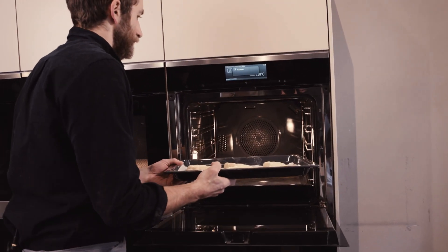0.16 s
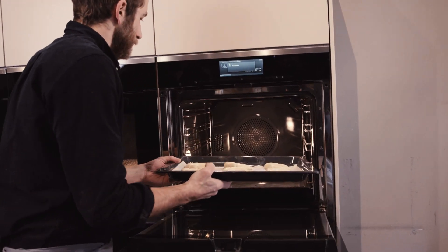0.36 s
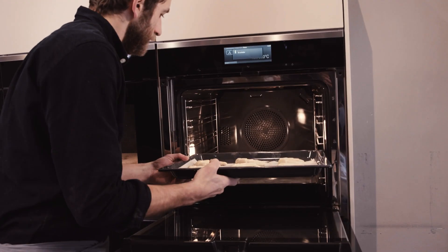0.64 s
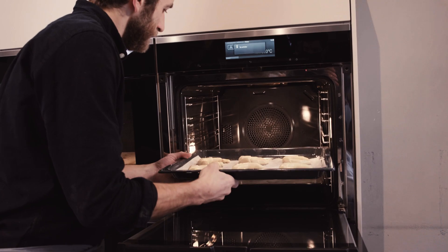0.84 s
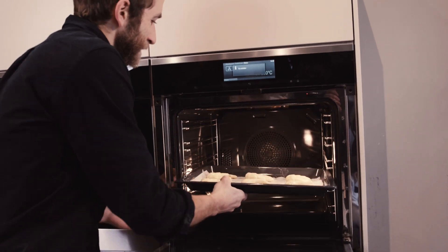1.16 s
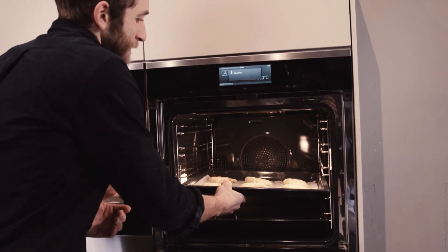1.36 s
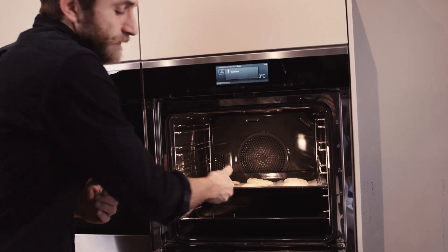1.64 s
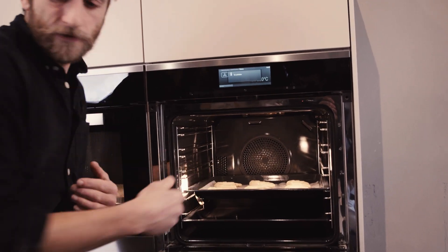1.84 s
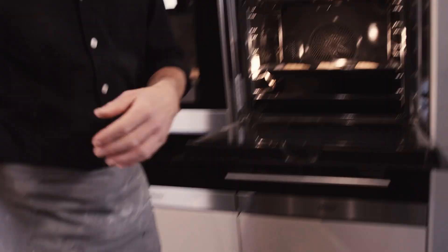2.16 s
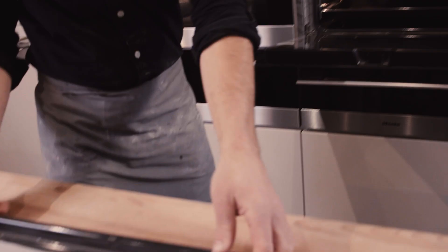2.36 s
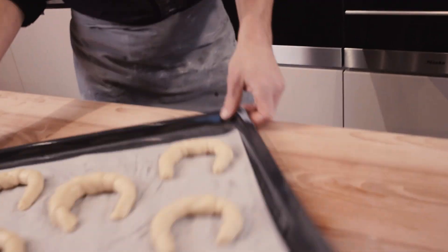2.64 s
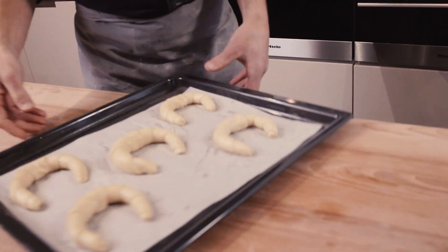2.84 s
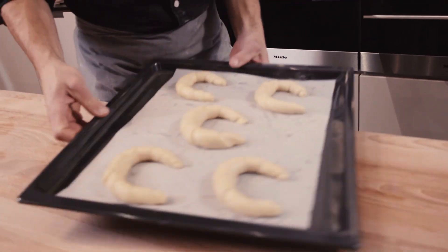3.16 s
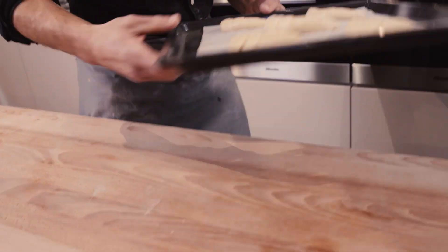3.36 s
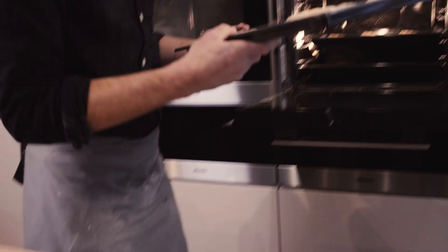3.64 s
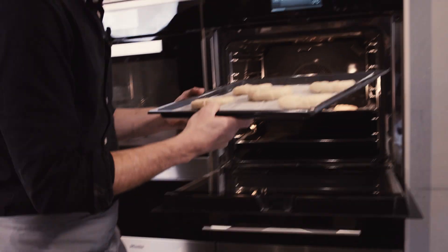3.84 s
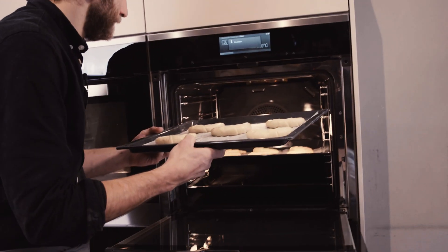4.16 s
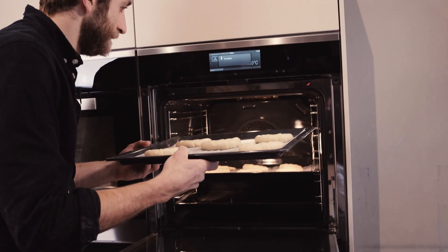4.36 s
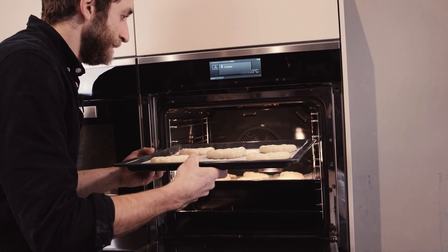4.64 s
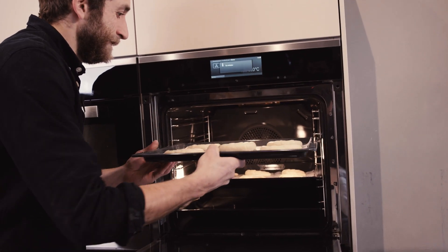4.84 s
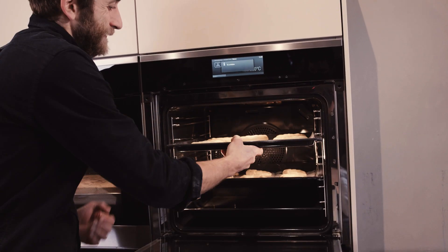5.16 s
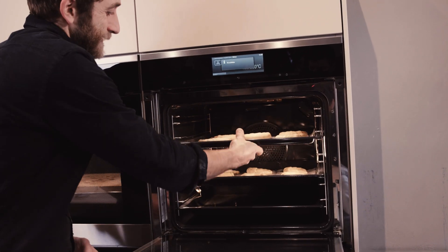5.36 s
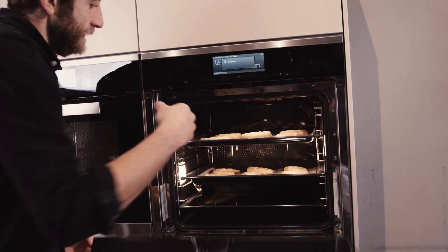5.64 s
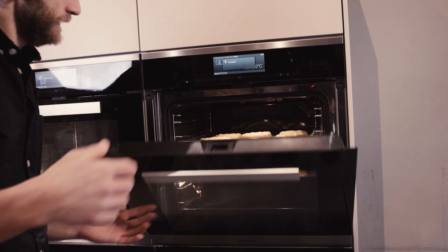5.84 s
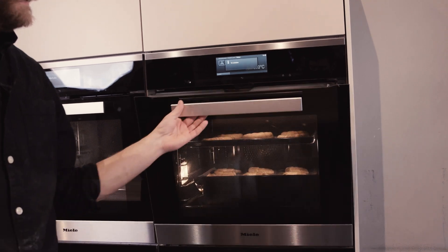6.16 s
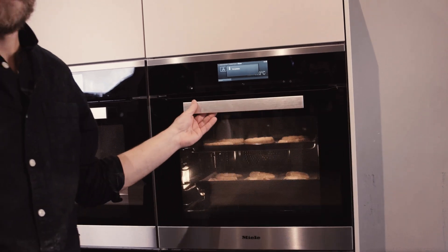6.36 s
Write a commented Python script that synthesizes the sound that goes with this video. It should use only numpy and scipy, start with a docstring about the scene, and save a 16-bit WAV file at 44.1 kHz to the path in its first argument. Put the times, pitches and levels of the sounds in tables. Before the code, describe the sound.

A metal baking tray clatters and scrapes onto oven rails, a second rasps off a wooden worktop and slides in, then the oven door bangs shut.

```python
"""Two steel baking trays are knocked onto an oven's wire rails and pushed home, in a hard-walled kitchen.
Blows ring each sheet's modes; random stick-slip makes the scrapes. In between, the second tray rasps and
judders off a wooden worktop. At the end the oven door swings up on creaking hinges and bangs shut.
Behind are footfalls, shuffling, sleeves, the oven's fan and hum. One microphone, a step or two away."""
import sys
import numpy as np
from scipy import signal
from scipy.fft import rfft, irfft
from scipy.io import wavfile

SR = 44100
rng = np.random.default_rng(int(sys.argv[2]) if len(sys.argv) > 2 else 0)


def store_wav(level_fs):
    """Save 16-bit WAV to argv[1]."""
    pcm = np.round(np.clip(np.atleast_2d(level_fs), -1, 1) * 32767)
    wavfile.write(sys.argv[1], SR, pcm.T.astype(np.int16))


N = 287091
TIME = np.arange(N) / SR

# Levels in the tables are relative: each source may have a gain of its own on top.
# A tray lands on the rails, one rim and then the other:
# (time [s], level [dB], bass [dB], treble [dB], second rim's lag [s], second rim's relative level [dB])
KNOCKS = [(0.517, -32.5, 9, -7, 0.0096, 5), (0.807, -26, -8, 10.5, 0.0091, 7.5),
          (0.866, -27, 5.5, -4, 0.029, 0), (1.051, -28.5, -6, 1.5, 0.0082, -1),
          (1.203, -21, -11, 8.5, 0.0073, 0.5), (1.322, -17, 1, 3.5, 0.0061, -15),
          (1.387, -23.5, -8, -1, 0.0073, -7), (1.510, -21, -2.5, 3, .006, -2),
          (1.5955, -17, -6, 8, .012, -1), (1.634, -22, -1, 4, .012, 2.5), (4.476, -30.5, 4, -2.5, .016, 5),
          (4.605, -30.5, 7.5, -0.5, .036, -8.5), (5.157, -20.5, -4, 6, .019, -1),
          (5.325, -22.5, 4, 7, .016, 2.5), (5.542, -22.5, 6.5, -3, 0.0092, -3.5)]
# The second rim sounds bassier and duller than the first and chatters longer; either may be louder
FIRST_CHATTER_S, SECOND_CHATTER_S = 0.0029, 0.0099  # time constants
SECOND_BASS_DB, SECOND_TREBLE_DB = 4.5, -2.5  # relative to the first rim
# Pushes along the rails:
# (start [s], fastest [s], end [s], level [dB], bright grit at the start relative to the scrape [dB])
PUSHES = [(0.80, 0.83, 1.0, -30.5, -7), (1.121, 1.21, 1.374, -27, -1), (1.38, 1.45, 1.54, -32.5, -25),
          (1.53, 1.565, 1.66, -25, -11), (4.84, 4.90, 4.9, -47, -9.5), (4.912, 5.14, 5.42, -24, -6.5),
          (5.28, 5.36, 5.565, -29.5, -3)]
SCRAPE_POWER = 0.25  # the scrape's amplitude is this power of the sliding speed
# The rim snags, and the scrape flares up as it breaks free:
# (time [s], added amplitude relative to the steady scrape [dB])
SNAGS = [(4.933, 5.5), (4.966, 0), (5.020, 0), (5.246, -2)]
SNAG_S = 0.018  # time constant of a flare
# Ringing partials of each tray on its rails: (frequency [Hz], level [dB])
LOWER_TRAY_PARTIALS = [(608.3, -41), (952.8, -59), (1206, -44.5), (1690, -64.5), (1954, -36.5),
                       (2266, -36.5), (2649, -31.5), (3036, -60.5), (3208, -39.5), (3418, -56.5),
                       (3575, -38.5), (4522, -36.5), (4980, -62.5), (5292, -45.5), (6115, -46),
                       (6385, -59.5)]
UPPER_TRAY_PARTIALS = [(699.8, -54), (1384, -76), (1916, -34), (2099, -63), (2622, -49), (2891, -58),
                       (3095, -34.5), (3300, -38), (3386, -41), (3752, -59), (3935, -54), (4048, -32),
                       (4296, -52), (4544, -63), (4834, -41), (5938, -64)]
# The crowd of short modes in each steel sheet: (frequency [Hz], level per Hz [dB])
LOWER_SHEET = [(40, -38.5), (85, -28.5), (130, 6), (300, 0.5), (450, 0.5), (650, 0.5), (900, -3),
               (1350, 0.5), (1650, -3.5), (2100, -2), (3000, -2.5), (5000, -8.5), (8000, -17.5),
               (15500, -31)]
UPPER_SHEET = [(40, -37), (85, -22), (140, 1.5), (300, 1), (480, -1.5), (700, 0), (1050, -3), (1350, 1.5),
               (1650, -3.5), (2000, 0), (3000, -4.5), (4500, -7.5), (7000, -17.5), (15500, -33.5)]
# Fine enamel roughness heard under the sliding tray: (frequency [Hz], level per Hz [dB])
GRIT_COLOUR = [(2000, -5), (7000, 1), (11000, -6.5), (14000, -5), (16000, -7)]
# The rack's dull thump under a knock: (frequency [Hz], level [dB], t60 [s])
RACK_MODES = [(134.2, 1.5, 0.31), (187.4, -2, 0.32), (257.5, -7, 0.23), (343, -4, 0.23)]
RACK_DB = -15.5
# The oven's liner and rails: (frequency [Hz], level [dB], t60 [s])
OVEN_MODES = [(121.4, 3.5, 0.83), (373, 0.5, 2.9), (740, -22, 1.4), (983, -6.5, 1.2), (1150, -7, 0.6),
              (2340, -18.5, 2.5), (3440, -18, 1.2), (12880, -12, .9)]

# One pull over the worktop: (start [s], fastest [s], end [s])
DRAG_STROKE = (2.53, 2.8, 3.249)
# Rasp of tray on wood: (frequency [Hz], level per Hz [dB])
DRAG_COLOUR = [(45, -36), (100, -8.5), (160, 1), (260, -2.5), (400, -3.5), (600, 1.5), (850, -8),
               (1400, -5.5), (2100, 0), (3000, -5.5), (5000, -11.5), (9000, -20), (15500, -30.5)]
# Ringing of the dragged tray: (frequency [Hz], level [dB], t60 [s])
DRAG_MODES = [(253, -6, 0.98), (1750, -4, 0.31), (2062, -1, 0.093), (2520, -6, 0.12), (3020, -6.5, 0.074),
              (3400, -16, 0.15)]
RASP_DB, RASP_POWER = -26.5, 1.02  # level at full speed; amplitude is this power of speed
JUDDER_DB, JUDDER_POWER = -34.5, 0.3  # the same for the judder
JUDDER_HZ, JUDDER_SAG_HZ = 575, 25.93  # mean pitch at rest and its drop at full speed
# The judder's last groan as the tray lifts off: (start [s], peak [s], end [s])
LIFT_STROKE = (3.185, 3.205, 3.222)
LIFT_DB = -33.5
# The rim bumping on the wood: (time [s], level [dB], bass [dB], treble [dB], chatter time constant [s])
BUMPS = [(2.652, -32, 12, -6, 0.0052), (2.885, -26.5, -20, 3, 0.03), (3.155, -32.5, -10, -9, 0.0016),
         (3.203, -38, 18, -11, 0.0039)]

# The door meeting its seal and catch:
# (time [s], level [dB], bass [dB], treble [dB], chatter time constant [s])
SLAM = [(6.414, -30.5, 9, -10, 0.032), (6.429, -20, 2, 4, 0.01), (6.444, -16, 5, -5, 0.0055),
        (6.480, -21, 1, -2, 0.024), (6.503, -30, 19, -2, 0.0037)]
# Short modes of the door: (frequency [Hz], level per Hz [dB])
DOOR_COLOUR = [(30, -45), (70, -20), (130, -2), (190, -6), (350, -5.5), (480, -5), (680, -6), (800, -8.5),
               (1020, -5), (1500, -16), (2400, -13.5), (2900, -8.5), (5000, -23), (15000, -45.5)]
# Ringing of the door: (frequency [Hz], level [dB], t60 [s])
DOOR_MODES = [(329, 5, 0.13), (451, -5, 0.097), (691.5, -6, 0.062), (1085, -4, 0.074), (2850, -2, 0.062)]
# Hinge creaks: (time [s], length [s], mean pitch [Hz], level [dB], rub relative to the tone [dB])
CREAKS = [(5.983, 0.028, 383, -33, -11), (6.012, 0.016, 348.1, -44, -4), (6.188, 0.07, 2368, -42, 3.5)]
# Rub of the hinges: (frequency [Hz], level per Hz [dB])
HINGE_COLOUR = [(80, -10), (350, -3), (900, -3), (2500, 1), (5000, -14.5), (14000, -36)]

# Soft footfalls that set the floor booming: (time [s], level [dB])
STEPS = [(0.181, -45), (0.27, -49), (1.99, -28), (2.039, -29.5), (2.27, -35.5), (3.599, -44), (5.781, -55)]
# The floor's boom: (frequency [Hz], level [dB], t60 [s])
FLOOR_MODES = [(114.1, -4.5, 0.8), (212.8, -9.5, 0.55)]
# The cook's movements: (middle [s], length [s], shuffle level [dB], cloth swish level [dB])
MOVES = [(0.112, 0.73, -40, -62), (0.68, 0.62, -39, -57), (2.123, 0.31, -45, -53), (2.384, 0.43, -47, -50),
         (3.48, 0.18, -51, -45.5), (3.62, 0.57, -48.5, -60.5), (4.14, .2, -61.5, -64),
         (4.416, 0.47, -56.5, -80), (4.85, .2, -55, -72), (6.05, 0.21, -46, -57),
         (6.366, 0.6, -52.5, -59.5)]
# Shuffling feet, sleeves, and the fan's air: (frequency [Hz], level per Hz [dB])
SHUFFLE_COLOUR = [(40, -47.5), (80, -13), (135, 6.5), (200, 0), (320, -7), (520, -1.5), (950, -5.5),
                  (1400, -10.5), (2500, -19.5), (5000, -30.5), (14000, -53)]
CLOTH_COLOUR = [(500, -23), (2500, 3), (7000, -6.5), (16000, -16.5)]
AIR_COLOUR = [(30, -50), (80, -18), (120, 0.5), (160, -4), (240, 3.5), (400, -4), (700, -9.5), (1100, -17),
              (2000, -20.5), (4000, -26), (8000, -34), (15500, -43.5)]
AIR_DB = -49
# Decay of the kitchen: (frequency [Hz], t60 [s])
KITCHEN_T60 = [(100, 0.82), (350, 1.15), (700, 0.84), (2500, 0.97), (5000, 0.7), (8000, 0.7), (15000, 0.58)]
# Strength of its reflections: (frequency [Hz], level relative to the sound sent to the walls [dB])
KITCHEN_WET = [(100, 1.5), (500, 2), (2000, -3.5), (5000, -7), (9000, -9.5), (15000, -22.5)]
TOP_HZ = 15700  # the recorder's upper limit


def tray(knocks, pushes, sheet, partials, ring_db, ring_t60, slips_hz, uneven_db, scrape_bass_db,
         dulling_db_per_s):
    """Knocks and sliding friction shake one steel tray; ring_t60 is its decay [s] at 1 kHz."""
    # higher partials die sooner
    modes = [(hz, db, ring_t60 * (hz / 1000) ** -.4) for hz, db in partials]
    rings = amp(ring_db) * ring(modes, seconds=.7)
    pressure, sizzle = pushing(pushes, dulling_db_per_s) * amp(uneven_db * walk(70))
    slips = friction(slips_hz, spread_db=4.5) * pressure
    scrape = slide(slips, sheet, t60=0.049, rings=rings)
    scrape = colour(scrape, [(150, scrape_bass_db), (1000, -6.0), (4500, 3.0), (8000, -2.5)])
    contacts = rims(knocks)
    blows = strike(contacts, sheet, t60=0.1, rings=rings, bounce_db=8, rebound_bass_db=-11)
    body = blows + thumps(contacts) + scrape
    # fine roughness of the enamel adds a bright sizzle
    grains = friction(rate=7800, spread_db=11) * sizzle
    grit = slide(grains, GRIT_COLOUR, t60=.035, rings=amp(-9.5) * rings)
    return amp(2.0) * body + amp(-2.5) * grit


def rims(knocks):
    """A tilted tray lands twice: the two contacts of each knock, as rows for strike."""
    rows = []
    for s, db, bass_db, treble_db, lag, second_db in knocks:
        rows.append((s, db, bass_db, treble_db, FIRST_CHATTER_S))
        rows.append((s + lag, db + second_db, bass_db + SECOND_BASS_DB, treble_db + SECOND_TREBLE_DB,
                     SECOND_CHATTER_S))
    return rows


def pushing(pushes, dulling_db_per_s):
    """Scrape and grit strength follow speed and flare at snags; the grit dulls as the tray goes in."""
    flare = 1
    for s, db in SNAGS:
        flare = flare + amp(db) * (TIME >= s) * np.exp(-abs(TIME - s) / SNAG_S)
    scrape, grit = 0, 0
    for start, fastest, end, db, grit_db in pushes:
        force = amp(db) * stroke(start, fastest, end) ** SCRAPE_POWER * flare
        dulling_db = dulling_db_per_s * np.clip(TIME - start, 0, end - start)
        scrape = np.hypot(scrape, force)
        grit = np.hypot(grit, force * amp(grit_db - dulling_db))
    return scrape, grit


def thumps(contacts):
    """The weight behind each contact makes the rack thump; the thump carries little deep bass."""
    out = np.zeros(N)
    thump = colour(ring(RACK_MODES, seconds=0.34).sum(0), [(45, -21), (115, -0.5)])
    for s, db, bass_db, _, _ in contacts:
        add(out, s, amp(db + bass_db + RACK_DB) * np.sqrt(SR / 40) * thump)
    return out


def liner(shaking):
    """Through the rails the trays set the oven's steel liner ringing, long and softly."""
    return signal.oaconvolve(shaking, ring(OVEN_MODES, seconds=2).sum(0))[:N]


def worktop():
    """The tray rasps over wood while its floor judders at a pitch that sags with speed."""
    speed = stroke(*DRAG_STROKE)
    rings = amp(-7.5) * ring(DRAG_MODES, seconds=0.78)
    rub = friction(rate=3500, spread_db=2.5)
    grip = speed ** RASP_POWER * amp(RASP_DB + 1.2 * walk(70))
    rasp = unit(colour(rub, DRAG_COLOUR)) * grip
    ringing = signal.oaconvolve(rub * grip, rings.sum(0))[:N]
    pitch = (JUDDER_HZ - JUDDER_SAG_HZ * speed) * (1 + 0.0695 * walk(160))
    shaking = amp(JUDDER_DB) * speed ** JUDDER_POWER + amp(LIFT_DB) * stroke(*LIFT_STROKE)
    judder = unit(np.sin(2 * np.pi * np.cumsum(pitch) / SR) * amp(5.1 * walk(60))) * shaking
    bumps = strike(BUMPS, DRAG_COLOUR, t60=0.11, rings=rings, bounce_db=2, rebound_bass_db=-4)
    return rasp + ringing + judder + bumps


def door():
    """The hinges creak as the door swings up; then it hits the seal and rattles into its catch."""
    creaks = np.zeros(N)
    for s, length, hz, db, rub_db in CREAKS:
        samples = int(length * SR)
        swell = np.sqrt(np.sin(np.pi * np.arange(samples) / samples))
        tone = unit(np.sin(2 * np.pi * np.cumsum(hz * (1 + .035 * walk(500))) / SR))
        rub = unit(colour(friction(rate=2500, spread_db=1), HINGE_COLOUR))
        add(creaks, s, amp(db) * swell * (tone + amp(rub_db) * rub)[:samples])
    rings = amp(-5) * ring(DOOR_MODES, seconds=.4)
    slam = strike(SLAM, DOOR_COLOUR, t60=0.17, rings=rings, bounce_db=7.5, rebound_bass_db=-3.5)
    return creaks + amp(1.5) * slam


def footfalls():
    """Each step leans softly on the floor, which booms for a moment."""
    out = np.zeros(N)
    boom = ring(FLOOR_MODES, seconds=0.9).sum(0)
    soft_onset = 1 - np.exp(-TIME[:len(boom)] / 0.029)
    boom *= soft_onset / abs(boom).max()
    for s, db in STEPS:
        add(out, s, amp(db + 6) * boom)
    return out


def background():
    """Shuffling and sleeves, as noise that follows speed, over the oven's fan and its wavering hum."""
    feet, sleeves = 0, 0
    for s, length, shuffle_db, cloth_db in MOVES:
        speed = stroke(s - length / 2, s, s + length / 2)
        feet = np.hypot(feet, amp(shuffle_db) * speed)
        sleeves = np.hypot(sleeves, amp(cloth_db) * speed)
    shuffle = unit(colour(rng.standard_normal(N), SHUFFLE_COLOUR)) * feet * amp(2.2 * walk(25))
    swish = friction(rate=7200, spread_db=3.0)
    cloth = unit(colour(swish, CLOTH_COLOUR)) * sleeves * amp(2.5 * walk(40))
    fan = unit(colour(rng.standard_normal(N), AIR_COLOUR)) * amp(AIR_DB + walk(3.7))
    hum = np.sin(2 * np.pi * np.cumsum(123 + 2 * walk(33)) / SR) * amp(-53 + 3.9 * walk(2.6))
    return shuffle + cloth + fan + hum


def kitchen(x):
    """Diffuse reflections off the hard walls; each octave dies at its own rate."""
    t = TIME[:int(1.5 * SR)]
    noise, tail = rfft(rng.standard_normal(len(t))), 0
    octave = np.log2(np.clip(np.arange(len(noise)) * SR / len(t), 125, 16000) / 125)
    for k in range(8):
        hz = 125 * 2 ** k
        shape = unit_energy(fade(t, along(KITCHEN_T60, hz)) * (1 - np.exp(-t / 0.0068)))
        band = irfft(noise * np.maximum(1 - abs(octave - k), 0), len(t))
        tail = tail + amp(along(KITCHEN_WET, hz)) * shape * band
    return signal.oaconvolve(x, tail)[:N]


def strike(rows, spectrum, t60, rings, bounce_db, rebound_bass_db):
    """Blows, each a first contact and a chatter of rebounds, on a body."""
    out, t = np.zeros(N), TIME[:SR // 8]
    for s, db, bass_db, treble_db, chatter in rows:
        rebounds = rng.standard_normal(len(t)) ** 3 * np.exp(-t / chatter)
        contact = amp(bounce_db) * unit_energy(rebounds)
        contact = colour(contact, [(150, rebound_bass_db), (700, 0)])  # rebounds are light
        contact[0] += 1
        # a heavy, soft contact favours the bass, a sharp corner the treble
        tilt = [(170, bass_db), (1000, 0.017), (2000, 0), (7000, treble_db)]
        push = colour(unit_energy(contact), tilt)
        blow = signal.fftconvolve(push, response(spectrum, t60, rings))
        add(out, s, amp(db) * np.sqrt(SR / 40) * blow)  # unit energy within 25 ms becomes rms 1
    return out


def slide(rub, spectrum, t60, rings):
    """The contact point travels, so every short stretch of friction meets a new response."""
    out, hop = np.zeros(N), SR // 30
    window = np.sin(np.pi * np.arange(2 * hop) / (2 * hop))
    for i in range(0, N - 2 * hop, hop):
        stretch = rub[i:i + 2 * hop]
        if stretch.any():
            add(out, i / SR, signal.fftconvolve(stretch * window, response(spectrum, t60, rings)))
    return out


def response(spectrum, t60, rings):
    """A body touched at one spot: a crack, a burst of countless short modes, and its own mix of partials."""
    t = TIME[:SR // 6]
    burst = unit_energy(rng.standard_normal(len(t)) * fade(t, t60))
    burst[0] += .5  # the crack
    weights = rng.choice([-1, 1], len(rings)) * rng.uniform(.6, 1.3, len(rings))
    partials = weights @ rings
    # the way the body is held and supported shifts its tuning slightly
    detune = 1 + .004 * rng.standard_normal()
    sample = np.arange(len(partials))
    out = np.interp(sample * detune, sample, partials, right=0)
    add(out, 0, unit_energy(colour(burst, spectrum)))
    return out


def friction(rate, spread_db):
    """Stick-slip: tiny slips at random moments, on average rate per second, of uneven size."""
    slips = (rng.random(N) < rate / SR) * rng.choice([-1, 1], N)
    return unit(slips * amp(spread_db * rng.standard_normal(N).clip(-2, 2)))


def ring(modes, seconds):
    """One decaying sine for each (Hz, energy dB, t60) mode; together they have unit energy."""
    t = TIME[:int(seconds * SR)]
    sines = [amp(db) / np.sqrt(t60) * fade(t, t60) * np.sin(2 * np.pi * hz * t) for hz, db, t60 in modes]
    return unit_energy(np.array(sines))


def stroke(start, fastest, end):
    """Speed of one movement of the arm, 0-1: an arch from rest to rest."""
    u = np.interp(TIME, [start, fastest, end], [-1, 0, 1])
    return 1 - u ** 2


def walk(rate):
    """Random drift of spread near 1: straight lines between rate new values per second."""
    return np.interp(TIME * rate, np.arange(N), rng.standard_normal(N))


def fade(t, t60):
    """Exponential decay, 60 dB down after t60."""
    return np.exp(-np.log(1000) * t / t60)


def colour(x, points):
    """Causal filter with the given (Hz, dB) response, built from its cepstrum."""
    size = 4096
    log_gain = np.log(amp(along(points, np.arange(size // 2 + 1) * SR / size)))
    cepstrum = irfft(log_gain)
    # folding the cepstrum forward in time gives minimum phase
    cepstrum[1:size // 2] *= 2
    cepstrum[size // 2 + 1:] = 0
    return signal.oaconvolve(x, irfft(np.exp(rfft(cepstrum))))[:len(x)]


def along(points, hz):
    """Read (Hz, value) points on a log-frequency axis."""
    f, value = np.transpose(points)
    return np.interp(np.log(np.maximum(hz, 1)), np.log(f), value)


def amp(db):
    """Amplitude of a level in dB."""
    return 10 ** (np.asarray(db) / 20)


def unit(x):
    """Scale to rms 1."""
    return x / np.sqrt(np.mean(x ** 2))


def unit_energy(x):
    """Scale to a summed square of 1."""
    return x / np.sqrt(np.sum(x ** 2))


def add(out, s, x):
    """Mix x in at time s."""
    i = min(int(s * SR), N)
    out[i:i + len(x)] += x[:N - i]


def scene():
    """Lower tray, worktop, upper tray, door: all in one room, the same in both channels."""
    second_tray_s = 3  # knocks and pushes after this belong to the upper tray

    def first(rows):
        return [row for row in rows if row[0] < second_tray_s]

    def second(rows):
        return [row for row in rows if row[0] > second_tray_s]

    lower = tray(first(KNOCKS), first(PUSHES), LOWER_SHEET, LOWER_TRAY_PARTIALS, ring_db=-9.5, ring_t60=0.2,
                 slips_hz=1298, uneven_db=3.2, scrape_bass_db=0, dulling_db_per_s=87)
    upper = tray(second(KNOCKS), second(PUSHES), UPPER_SHEET, UPPER_TRAY_PARTIALS, ring_db=-12, ring_t60=0.18,
                 slips_hz=1105, uneven_db=1.0, scrape_bass_db=-4.5, dulling_db_per_s=6)
    trays, bench, front = lower + upper, worktop(), door()
    oven = liner(amp(-19.5) * lower + amp(-29.5) * upper)
    # what is nearer sends less to the walls
    room = kitchen(amp(-3.5) * trays + amp(-7.0) * bench + amp(-4.5) * front)
    mono = trays + oven + bench + front + room + footfalls() + background()
    return np.array([mono, mono])


def record(dry):
    """The recorder rounds the peaks, sheds the deep bass and cuts the top."""
    rounded = np.tanh(dry)
    thin = signal.sosfilt(signal.butter(3, 64, "high", fs=SR, output="sos"), rounded)
    return signal.sosfilt(signal.ellip(14, .2, 80, TOP_HZ, fs=SR, output="sos"), thin)


dry = scene()
out = record(dry)
store_wav(out)
```